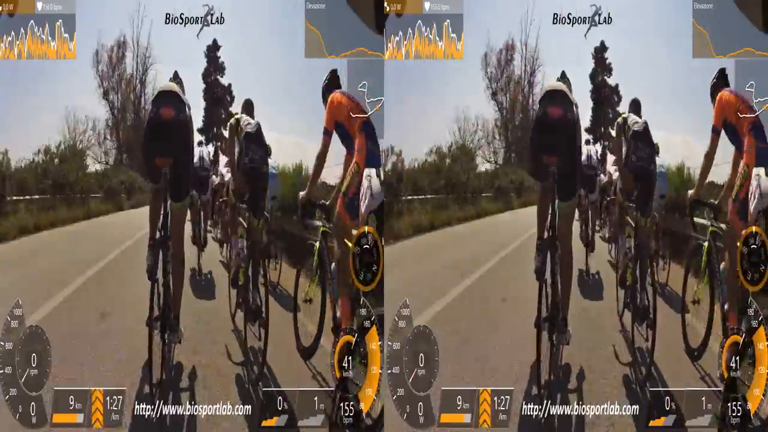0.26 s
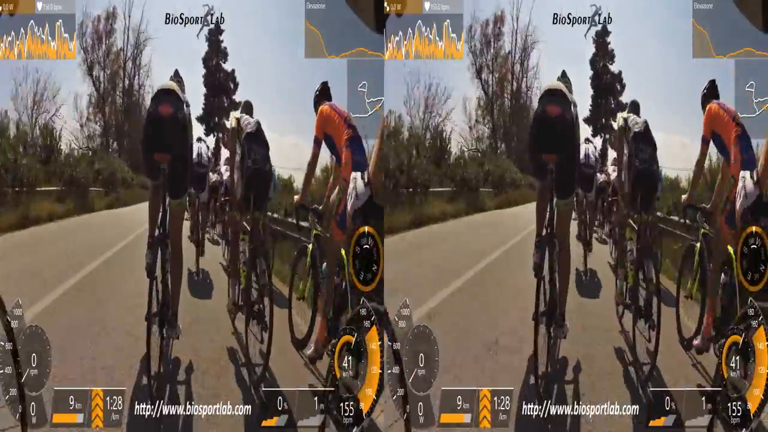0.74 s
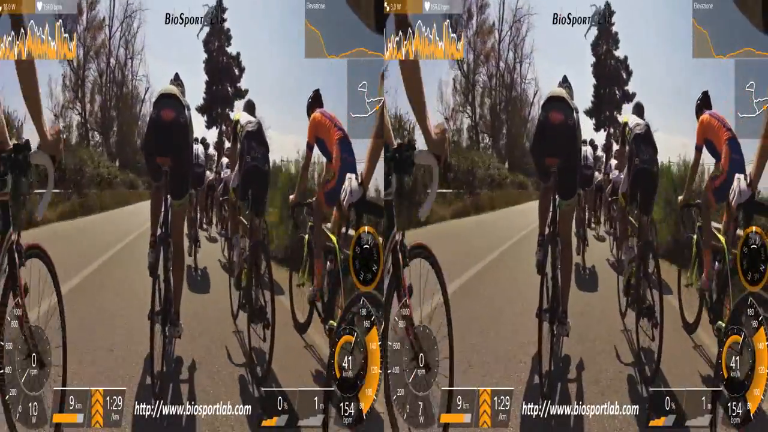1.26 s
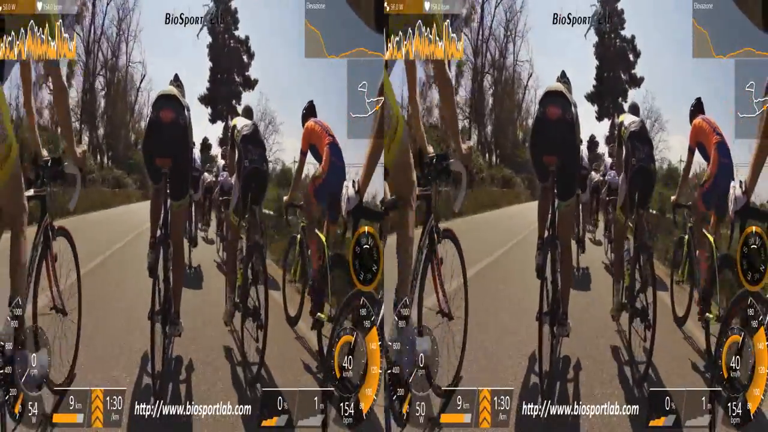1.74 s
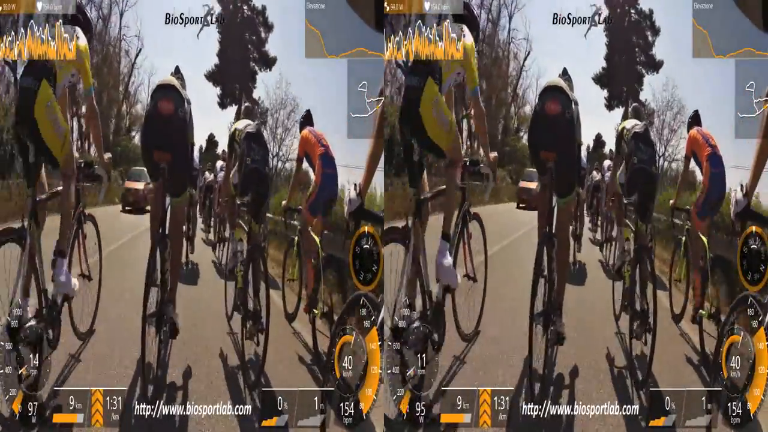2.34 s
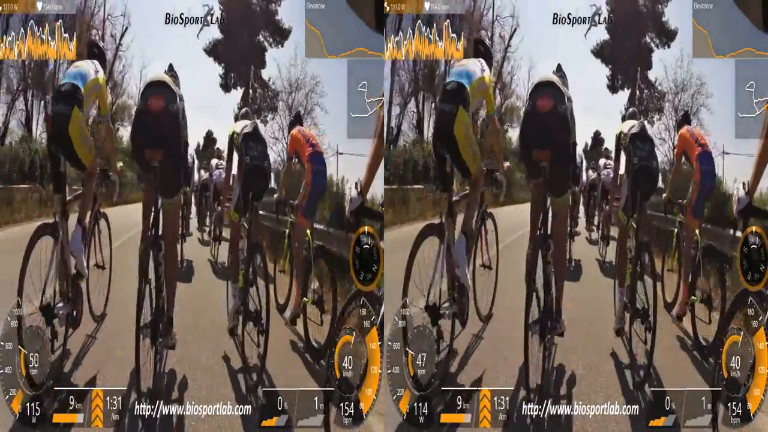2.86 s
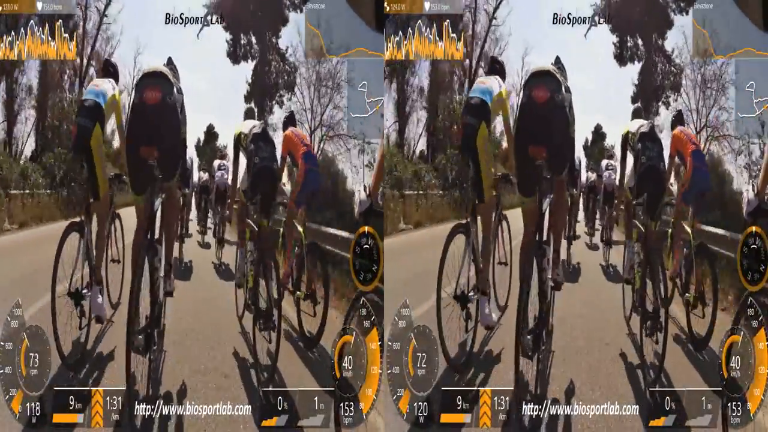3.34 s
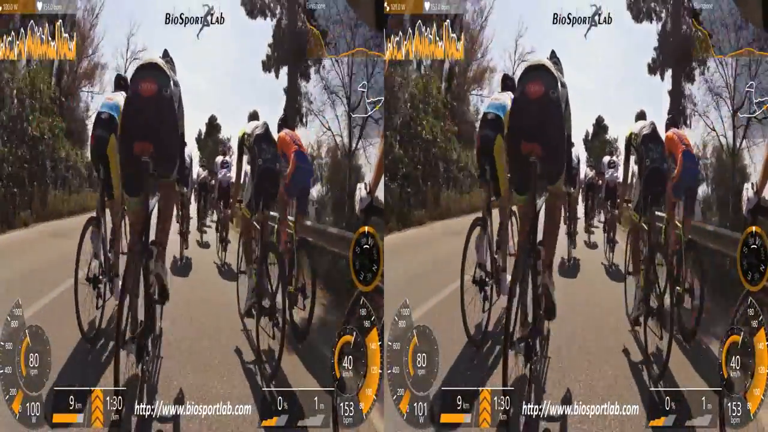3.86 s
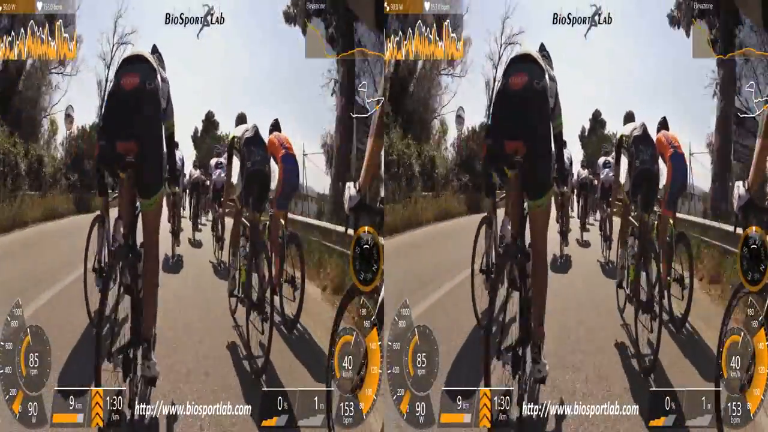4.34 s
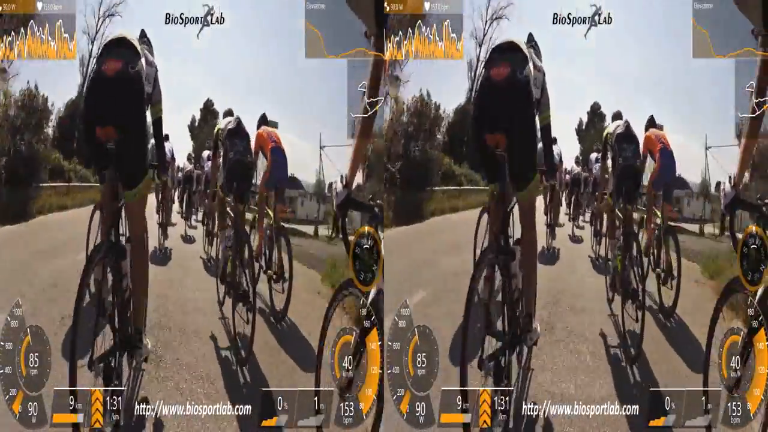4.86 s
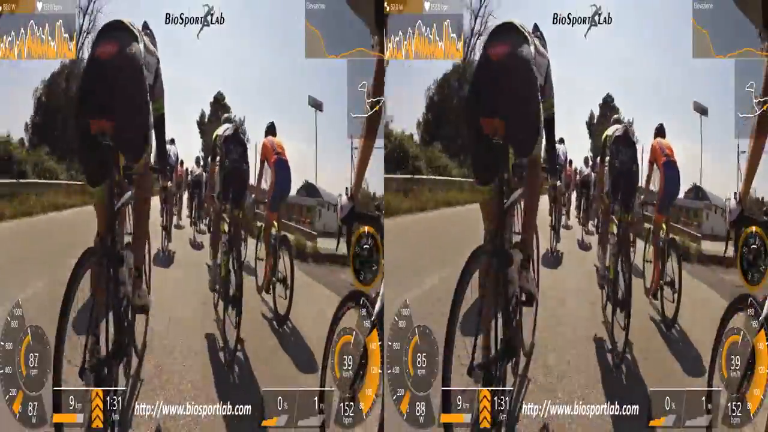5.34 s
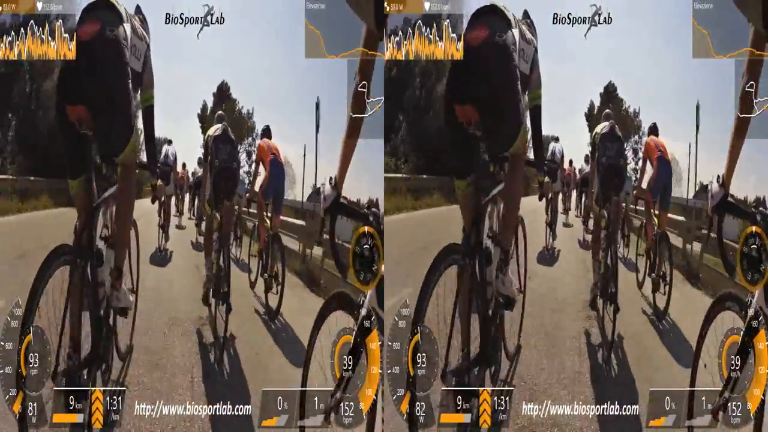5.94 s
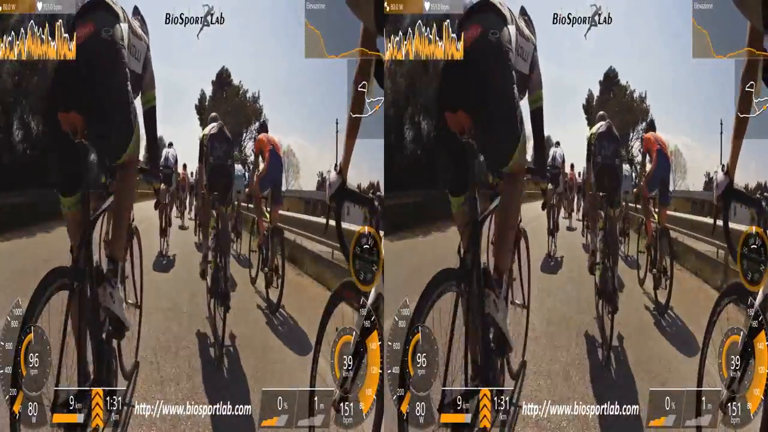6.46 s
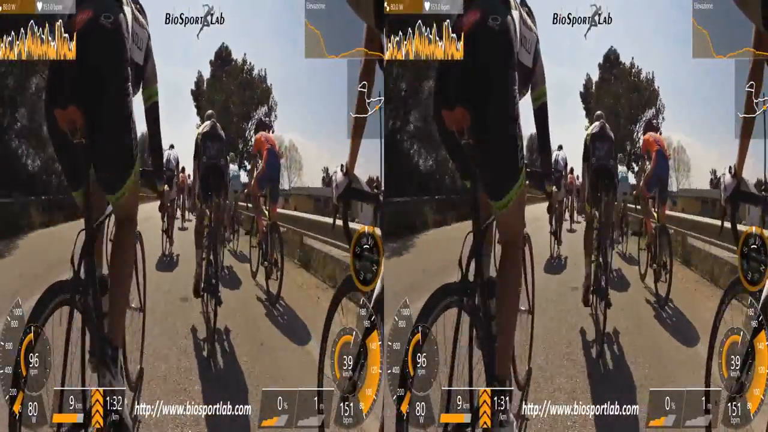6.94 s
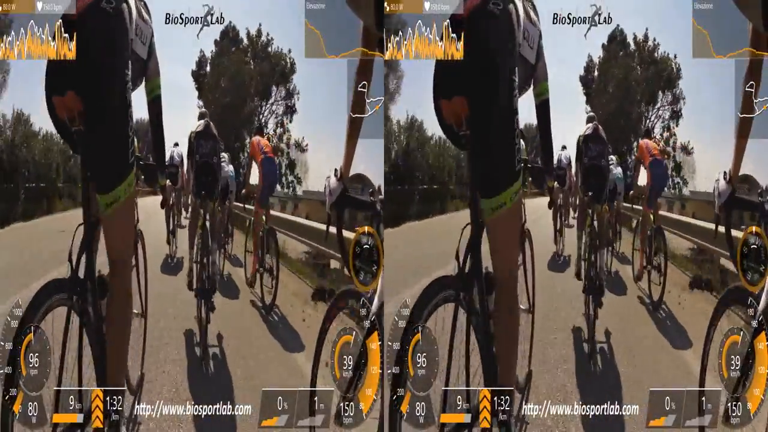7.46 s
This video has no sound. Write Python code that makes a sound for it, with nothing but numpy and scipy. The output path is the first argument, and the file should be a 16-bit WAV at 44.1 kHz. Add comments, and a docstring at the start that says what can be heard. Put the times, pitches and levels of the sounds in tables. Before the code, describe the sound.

Muffled road and tyre roar through a racing bicycle's frame, with a loose part clicking rapidly and irregularly against the camera case and occasional low thuds.

```python
"""A camera in a closed case, clamped to a racing bicycle at speed.
From the start, road and tyre noise rushes through the ringing frame, wind shakes the case, and a loose part
strikes it as short decaying rings. A thin noise band fades out near 0.8 s; gusts swell near 0.4 s and 3.4 s.
From 1.5 s on, cracks in the road thud as decaying low tones with a rough crackle, and the input flattens
the loudest peaks. The rush and rattle go on to the end, over a faint input hiss."""
import sys
import numpy as np
from scipy import signal
from scipy.io import wavfile
from scipy.ndimage import uniform_filter1d

SR = 44100
rng = np.random.default_rng(int(sys.argv[2]) if len(sys.argv) > 2 else 0)


def store_pcm(level_fs):
    """Save levels as 16-bit WAV."""
    pcm = np.round(np.clip(level_fs, -1, 1) * 32767).astype(np.int16)
    wavfile.write(sys.argv[1], SR, np.atleast_2d(pcm).T)


N = 339559  # length [samples]

# Blows of the loose part on the case: (time [s], peak of the first touch's ring [dB])
CASE_BLOWS = [(0.015, -19.5), (0.0244, -20), (0.0822, -8.5), (0.2445, -11), (0.2547, -21), (0.2665, -22),
              (0.275, -32), (0.3986, -7), (0.409, -21), (0.464, -14.5), (0.4754, -18.5), (0.4877, -21),
              (0.5119, -22), (0.5229, -23), (0.5372, -20), (0.5487, -24), (0.5628, -28), (0.6151, -18),
              (0.6259, -20), (0.6398, -23), (0.6739, -15), (0.6803, -20), (0.694, -20.5), (0.7526, -5.5),
              (0.763, -18), (0.7728, -20.5), (0.859, -5), (0.8693, -22), (0.9006, -16), (0.9127, -18.5),
              (0.92, -29), (1.036, -6.5), (1.0569, -11), (1.0665, -22), (1.0803, -25), (1.0907, -22.0),
              (1.104, -22), (1.1159, -31.5), (1.144, -19), (1.1531, -15), (1.1626, -23), (1.203, -18),
              (1.2134, -32), (1.237, -12), (1.2785, -9), (1.2887, -16), (1.3386, -19.5), (1.349, -23),
              (1.413, -13.5), (1.4233, -25), (1.4934, -11.5), (1.5028, -13), (1.513, -20), (1.5238, -22),
              (1.537, -36), (1.591, -19), (1.605, -21), (1.614, -20.5), (1.678, -9.5), (1.729, -10.5),
              (1.7424, -18.5), (1.7914, -26), (1.8202, -23), (1.857, -25), (1.9155, -17.5), (1.928, -17.5),
              (1.94, -28), (1.954, -28), (1.9646, -25), (1.9764, -19.5), (1.9888, -19), (2.0015, -26),
              (2.0932, -15.5), (2.105, -28), (2.1563, -11), (2.165, -23.5), (2.1873, -19), (2.2211, -15.5),
              (2.2305, -13), (2.264, -21.5), (2.3454, -17), (2.354, -16.5), (2.3645, -26), (2.474, -8),
              (2.5548, -4), (2.565, -26), (2.6696, -14), (2.6811, -16), (2.6933, -31), (2.794, -9),
              (2.8044, -20), (2.8603, -18.5), (2.9508, -24), (2.9594, -26), (2.971, -29), (3.0349, -21),
              (3.0466, -19.5), (3.0567, -19), (3.0678, -18.5), (3.078, -28), (3.0893, -23.5),
              (3.3222, -29.5), (3.3814, -11), (3.4107, -10.5), (3.419, -24), (3.4307, -26), (3.582, -10.5),
              (3.6007, -13), (3.6363, -24), (3.6476, -26), (3.6573, -24), (3.6685, -23), (3.679, -31),
              (3.7718, -5), (3.778, -25), (3.8033, -7.5), (3.8158, -22.0), (4.0217, -1.5), (4.034, -11.5),
              (4.0448, -19), (4.0556, -18.5), (4.0686, -31), (4.217, -15.5), (4.2647, -4.5), (4.274, -25),
              (4.2887, -27), (4.3143, -23), (4.384, -11.0), (4.3947, -21.5), (4.404, -26), (4.4163, -26),
              (4.4262, -31.5), (4.4354, -26.5), (4.446, -24.5), (4.468, -28), (4.5117, -9), (4.5757, -4.5),
              (4.586, -15.5), (4.5992, -30), (4.646, -11), (4.6576, -25), (4.668, -15), (4.6933, -26),
              (4.703, -25.5), (4.7801, -10), (4.792, -27), (4.801, -23), (4.812, -15.5), (4.936, -5.5),
              (5.0692, -9.5), (5.0835, -17), (5.0944, -23.5), (5.108, -28), (5.121, -27), (5.131, -21),
              (5.146, -22), (5.1574, -19), (5.165, -12), (5.1734, -21), (5.1837, -32), (5.198, -33),
              (5.2105, -33), (5.255, -30), (5.266, -7.5), (5.2996, -8.5), (5.3105, -18), (5.3356, -29),
              (5.3462, -27), (5.3589, -26), (5.381, -30), (5.3913, -26.5), (5.405, -25), (5.441, -10.5),
              (5.5368, -12.5), (5.5463, -18), (5.556, -17.5), (5.5785, -20), (5.5926, -20), (5.6019, -26),
              (5.6655, -5.5), (5.68, -22.5), (5.695, -20.5), (5.7086, -31), (5.7318, -27.5), (5.7663, -27),
              (5.8554, -8), (5.884, -30), (5.892, -10.5), (5.9052, -18), (5.9176, -25), (5.9298, -25.5),
              (5.9357, -12), (5.9415, -30), (5.955, -28), (5.9655, -36), (5.979, -36), (5.991, -35),
              (6.0265, -14), (6.0778, -17.5), (6.088, -26), (6.1, -31), (6.1077, -29), (6.208, -12.5),
              (6.2884, -12.5), (6.31, -21), (6.3527, -30), (6.365, -32), (6.5664, -7), (6.593, -10),
              (6.644, -6), (6.7335, -15), (6.7414, -12.5), (6.7528, -25), (6.7636, -21), (6.775, -20.5),
              (6.898, -15), (6.9106, -32), (6.93, -19.5), (6.9388, -19), (6.9947, -19), (7.0257, -8.5),
              (7.0448, -8.5), (7.0551, -20.5), (7.076, -27.0), (7.0863, -22.5), (7.1794, -19.5),
              (7.2686, -14), (7.2899, -29), (7.297, -24), (7.31, -16.5), (7.3223, -32.0), (7.331, -22),
              (7.3423, -20), (7.352, -27), (7.3639, -26), (7.3752, -26), (7.4327, -12.5), (7.441, -24),
              (7.4512, -26), (7.4642, -20.5), (7.4733, -26), (7.486, -18), (7.4973, -25), (7.5132, -23),
              (7.5404, -27), (7.5502, -21.5), (7.5625, -19.5), (7.572, -19), (7.6106, -23), (7.6513, -9),
              (7.6629, -30), (7.6739, -23)]
# Tones the case rings with: (pitch [Hz], strength [dB], time to fall 60 dB [s], polarity [+1 or -1])
CASE_TONES = [(1704, -10.5, 0.012, -1), (2456, -5, 0.011, 1), (2790, -10, 0.012, 1), (3140, -4, 0.012, -1),
              (3466, 8, 0.0038, 1), (4347, -21, 0.015, 1), (5030, -20, 0.009, -1), (5860, -9, 0.0062, 1),
              (7040, -7.5, 0.006, 1), (8300, -10.5, 0.0063, -1)]
# Frame resonances fed by the road: (pitch [Hz], width of one filter pass [Hz], relative level [dB])
FRAME_RESONANCES = [(232, 164, -5), (308.8, 131, 1.5), (475, 166, 0), (803, 120, -14.5),
                    (1064.6, 122, -11.5), (1343, 160, -18.5), (1652, 540, -17.5), (2430, 670, -37),
                    (3380, 510, -31.5), (3507, 220, -39.5), (4460, 620, -53.5)]
# Low resonances shaken by the wind: (pitch [Hz], width of one filter pass [Hz], relative level [dB])
WIND_RESONANCES = [(48, 43, -4), (79.4, 45, -3.5), (160, 98, -1)]
# Cracks in the road: (time [s], strength of the kick [dB], pitch [Hz], time to fall 60 dB [s], crackle [dB])
ROAD_CRACKS = [(1.529, -1, 187, 0.041, -37), (1.537, -6.5, 266, 0.031, -42), (3.175, 1, 373, 0.032, -23),
               (3.468, -2, 410, 0.022, -34), (4.428, -8.5, 100, 0.069, -39), (5.159, 1, 138, 0.046, -31),
               (5.1615, 1, 291, 0.045, -28), (5.1654, 3.5, 706, 0.017, -20), (5.174, -3, 477, 0.02, -26),
               (5.923, -6, 121, 0.19, -14.5), (5.929, 2, 326, 0.033, -25), (5.9428, 1.5, 348, 0.045, -35),
               (5.9525, -1, 328, .04, -24)]
# Gusts that slap the case: (time [s], wind gain added at the height [dB])
WIND_GUSTS = [(0.361, -23.5), (3.36, -25)]

THIN_HISS_DB, THIN_HISS_ENDS_S, THIN_HISS_FADE_S = -56, 0.76, .08
WIND_DB, GUST_RISE_S, GUST_FALL_S = -28.5, 0.031, 0.02
ROAD_DB = -16.5
ROUGH_DB, ROUGH_PER_S = 1.33, 40  # coarse asphalt: size of the level changes, new levels per second
RUSH_TOP_HZ = 4330  # the case shuts out the rush above this
BOUNCE_S = .0106  # usual time from one touch to the next
DRAG_S = .0008  # how long a touch drags
CASE_WALL_HZ = 5290  # the case wall muffles the ring above this
SOFT_ONSET_S = .0004  # soft onset of each ring
GLANCING_DB, GLANCE_SCATTER = 12, .3  # blows this far under full scale glance; growth per further dB
KNOCK_HZ, KNOCK_S = 1390, 0.0071
KNOCK_LAG_S = 0.0001  # the dull knock travels round through the clamp
KNOCK_DB, KNOCK_GROWTH, KNOCK_SCATTER_DB = -10, 0.69, 3.5  # growth: dB of knock per dB of blow
CRACK_GROWTH = 1.3  # dB of crack per dB of blow
INPUT_TOP_HZ, TOP_HZ = 11100, 16500  # gentle dulling, then a steep cut


def undb(db):
    """Turn decibels into a plain multiplier."""
    return 10 ** (np.asarray(db) / 20)


def level(x, db):
    """Scale a sound to an average (rms) level in dB."""
    return x * undb(db) / np.sqrt(np.mean(x ** 2))


def walk(rate):
    """Random levels held for 1 / rate seconds, then smoothed twice; spread near 1."""
    hold = int(SR / rate)
    steps = np.repeat(rng.standard_normal(N // hold + 1), hold)
    smooth = uniform_filter1d(uniform_filter1d(steps, hold), hold)
    return 1.18 * smooth[:N]  # smoothing shrinks the spread


def ring(hz, t60, length):
    """One tone dying away after a unit blow, falling 60 dB in t60 seconds."""
    t = np.arange(int(length * SR)) / SR
    return np.sin(2 * np.pi * hz * t) * np.exp(-np.log(1000) * t / t60)


def push(seconds):
    """A rounded contact force of unit area: the longer it lasts, the duller the blow."""
    t = np.arange(int(seconds * SR) + 1) / SR
    force = np.sin(np.pi * (t + .5 / SR) / (seconds + 1 / SR)) ** 2
    return force / force.sum()


def add(out, s, sound):
    """Mix a short sound into out, starting at s seconds."""
    k = int(s * SR)
    out[k:k + len(sound)] += sound[:len(out) - k]


def shaken(modes, flicker_db, rate):
    """Noise in steep resonances, each flickering on its own; overall rms 1."""
    out = 0
    for hz, width, db in modes:
        b, a = signal.iirpeak(hz, hz / width, fs=SR)
        once = signal.lfilter(b, a, rng.standard_normal(N))
        noise = signal.lfilter(b, a, once)  # a second pass steepens the resonance
        out = out + level(noise, db) * undb(flicker_db * walk(rate))
    return level(out, 0)


def input_hiss():
    """The input's own faint hiss: flickering noise in two high, broad bands."""
    return undb(-84.5) * shaken([(6500, 3300, 0), (10500, 5000, -7)], flicker_db=3.0, rate=22)


def thin_hiss(t):
    """A narrow band of noise that fades out early on."""
    fading = undb(THIN_HISS_DB) * (1 - np.tanh((t - THIN_HISS_ENDS_S) / THIN_HISS_FADE_S)) / 2
    return fading * shaken([(4150, 1000, 0)], flicker_db=1.5, rate=25)


def wind(t):
    """Wind shakes low resonances; each gust swells and drops off more quickly."""
    gain = undb(WIND_DB)
    for s, db in WIND_GUSTS:
        side_s = np.where(t < s, GUST_RISE_S, GUST_FALL_S)
        gain = gain + undb(db) * np.exp(-np.abs(t - s) / side_s)
    return gain * shaken(WIND_RESONANCES, flicker_db=3.0, rate=12)


def road_rush():
    """Tyre and road shake the frame; coarse asphalt varies all its resonances at once."""
    roughness = undb(ROAD_DB + ROUGH_DB * walk(ROUGH_PER_S))
    road = roughness * shaken(FRAME_RESONANCES, flicker_db=2.0, rate=25)
    # a narrow dip in the rush near 2800 Hz
    return signal.lfilter(*signal.iirnotch(2800, 8.0, fs=SR), road)


def bumps(crackle_s=0.0092):
    """A crack in the road kicks a low frame tone and sets off a short rough crackle."""
    thuds, jolts = np.zeros(N), np.zeros(N)
    for s, db, hz, t60, crackle_db in ROAD_CRACKS:
        add(thuds, s, undb(db) * np.convolve(ring(hz, t60, 0.177), push(0.0012)))
        add(jolts, s, undb(crackle_db) * np.exp(-np.arange(2000) / (crackle_s * SR)))
    crackle = shaken([(800, 800, 0)], flicker_db=0.5, rate=20.6)
    return thuds + uniform_filter1d(jolts, size=80) * crackle


def chatter(count=270, top_db=-32.0, spread_db=7.0):
    """List faint touches about whole bounces after the blows, tending to fade with each bounce."""
    chance = rng.random((count, 4))
    after = np.array(CASE_BLOWS)[(chance[:, 0] * len(CASE_BLOWS)).astype(int)]
    hops = np.ceil(-2.5 * np.log(chance[:, 1]))  # few bounces are likelier than many
    s = after[:, 0] + BOUNCE_S * (hops + .15 * (chance[:, 2] - .5))
    db = top_db - .5 * hops + spread_db * np.log(chance[:, 3])
    return np.transpose([np.clip(s, .01, N / SR - .01), db])


def scuff(seconds, share):
    """A contact that drags: one touch inside a short smear of grit, sharing about unit energy."""
    t = np.arange(-100, 300) / SR  # the touch itself is at sample 100
    fade_s = np.where(t < 0, seconds / 2, seconds)
    grit = rng.standard_normal(len(t)) * np.exp(-np.abs(t) / fade_s)
    share = np.clip(share, 0, 1)
    return np.sqrt(1 - share) * (t == 0) + np.sqrt(share) * grit / np.sqrt(np.sum(grit ** 2))


def dull_knock():
    """A low tone that swells and is choked off; its peak is 1."""
    swell = push(KNOCK_S)
    knock = swell * np.sin(2 * np.pi * KNOCK_HZ * np.arange(len(swell)) / SR)
    return knock / np.abs(knock).max()


def case_ring(glance, scatter_db, colour):
    """The case's tones sound together, each a little stronger or weaker from blow to blow."""
    body = 0
    for (hz, db, t60, sign), r in zip(CASE_TONES, colour):
        gain = undb(db + (scatter_db + glance / 2) * r)
        body = body + np.sign(sign) * gain * ring(hz, t60, .03)
    return body * (1 - np.exp(-np.arange(len(body)) / (SOFT_ONSET_S * SR)))


def rattle(blows, soft_s=0.00027, harder_s=.000004, uneven=0.071, drag_s=DRAG_S, grit=0.24,
           scatter_db=0.3, skid_db=-8, skid_s=0.002, crack_db=-44, crack_s=0.0015):
    """Blows ring the case and skid into a softer second touch; stronger ones tend to be shorter, so brighter."""
    out, cracks = np.zeros(N), np.zeros(N)
    wall = signal.butter(4, CASE_WALL_HZ, fs=SR, output="sos")
    knock = dull_knock()
    chance = rng.standard_normal((len(blows), len(CASE_TONES) + 4))
    for (s, db), (late, weak, hard, dull, *colour) in zip(blows, chance):
        # weak blows glance off: uneven colour, more drag
        glance = max(-db - GLANCING_DB, 0) * GLANCE_SCATTER
        body = case_ring(glance, scatter_db, colour)
        contact_s = max(soft_s - harder_s * (db + 33.5), 0) * np.exp(uneven * hard)
        tick = np.convolve(body, push(contact_s))
        tick = np.convolve(tick, scuff(drag_s * (1 + glance / 4), grit + glance / 10))
        tick = signal.sosfilt(wall, tick)
        tick = undb(db) * tick / np.abs(tick).max()
        start = s - 100 / SR  # makes room for the grit ahead of the touch
        add(out, start, tick)
        second = undb(skid_db + 2.5 * weak) * np.convolve(tick, push(.0006))
        add(out, start + skid_s * abs(1 + .2 * late), second)
        knock_db = KNOCK_DB + KNOCK_GROWTH * db + KNOCK_SCATTER_DB * dull
        add(out, s + KNOCK_LAG_S, undb(knock_db) * knock)
        add(cracks, s, undb(CRACK_GROWTH * db + crack_db) * np.exp(-np.arange(400) / (crack_s * SR)))
    # a thin crack of noise gets past the wall
    return out + cracks * shaken([(8800, 3500, -4.5), (12500, 6000, -10.5)], flicker_db=3.0, rate=25)


def scene():
    """Mix the hisses, the rush muffled by the case, and the rattle."""
    t = np.arange(N) / SR
    muffle = signal.butter(4, RUSH_TOP_HZ, fs=SR, output="sos")
    rush = signal.sosfilt(muffle, road_rush() + wind(t) + bumps())
    faint = rattle(chatter(), drag_s=.0007, grit=.35, scatter_db=3, skid_db=-12, crack_db=-41)
    ticks = rattle(CASE_BLOWS) + faint
    return (input_hiss() + thin_hiss(t) + rush + ticks)[None]


def record(dry):
    """The input drops the deepest bass, flattens the loudest peaks, dulls and cuts the top."""
    x = signal.sosfilt(signal.butter(6, 36, "high", fs=SR, output="sos"), dry)
    x = x / (1 + np.abs(x / .97) ** 10) ** (1 / 10)  # peaks stay under .97 here
    x = signal.sosfilt(signal.butter(2, INPUT_TOP_HZ, fs=SR, output="sos"), x)
    return signal.sosfilt(signal.ellip(8, .2, 70, TOP_HZ, fs=SR, output="sos"), x)


dry = scene()
out = record(dry)
store_pcm(out)
```